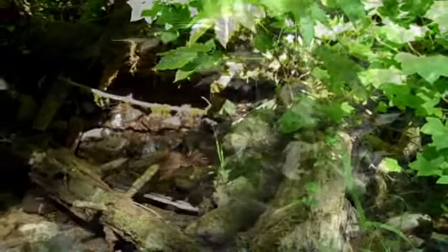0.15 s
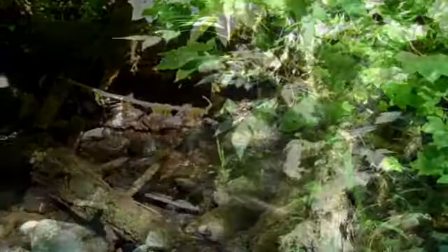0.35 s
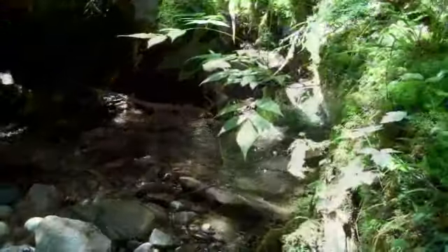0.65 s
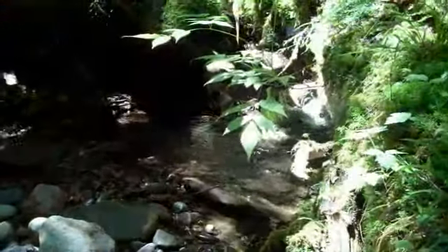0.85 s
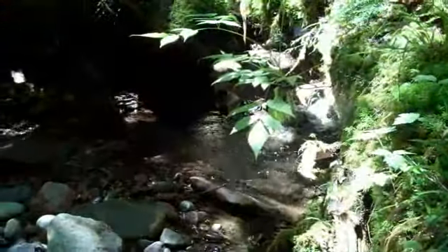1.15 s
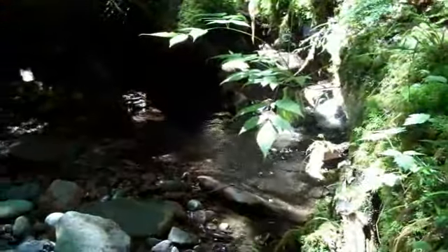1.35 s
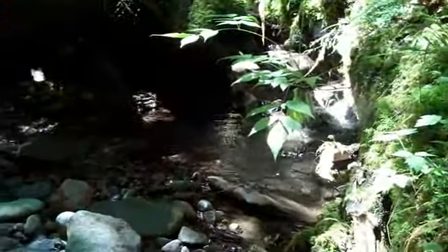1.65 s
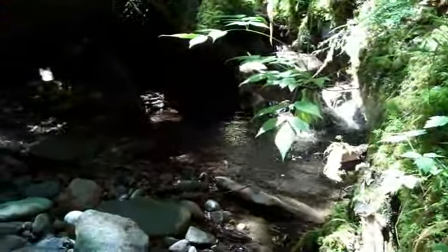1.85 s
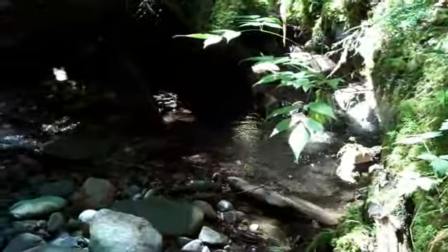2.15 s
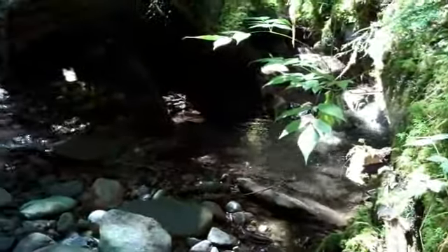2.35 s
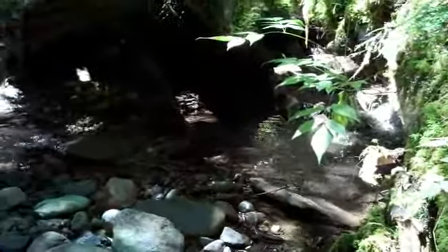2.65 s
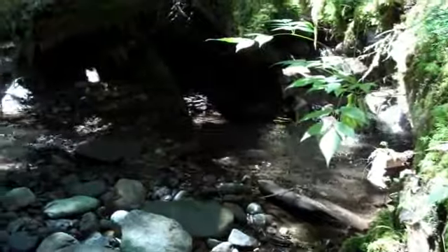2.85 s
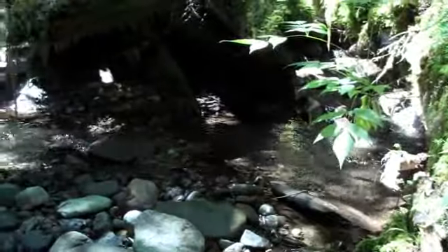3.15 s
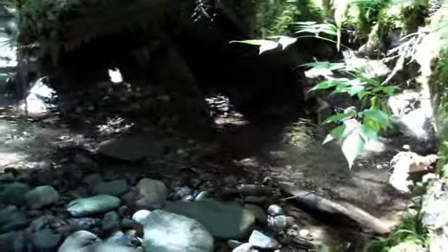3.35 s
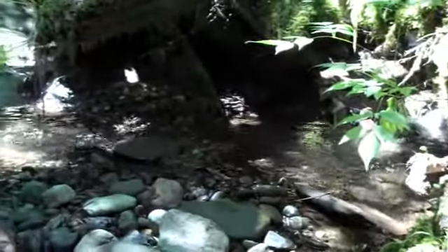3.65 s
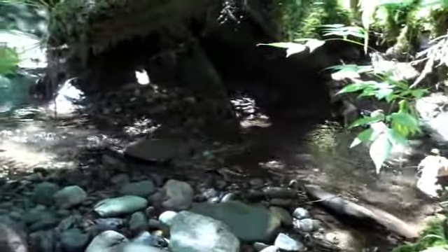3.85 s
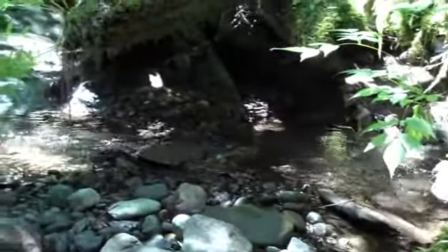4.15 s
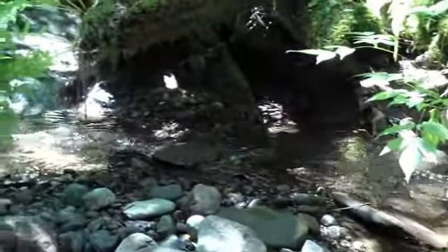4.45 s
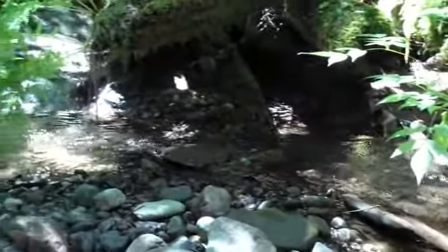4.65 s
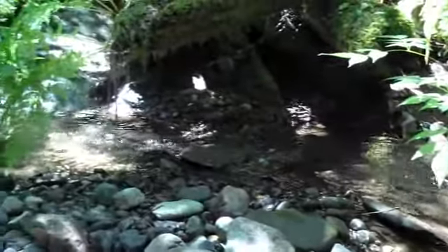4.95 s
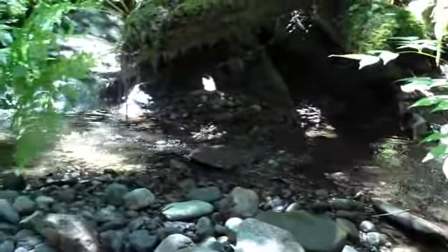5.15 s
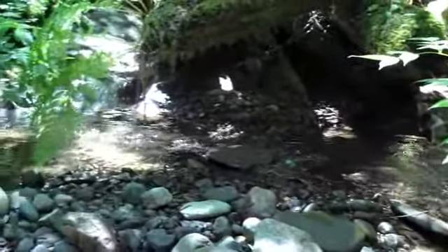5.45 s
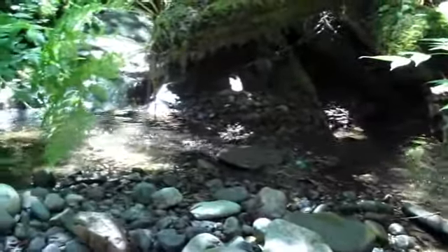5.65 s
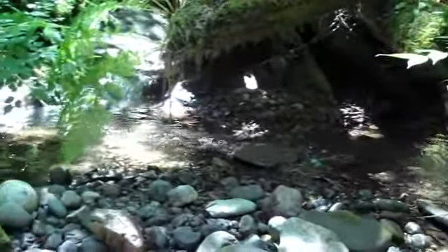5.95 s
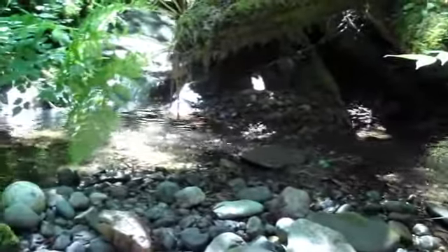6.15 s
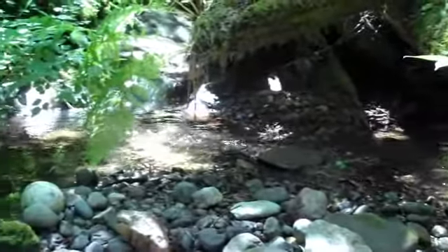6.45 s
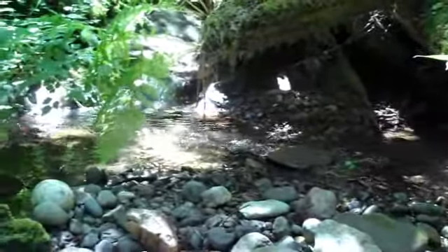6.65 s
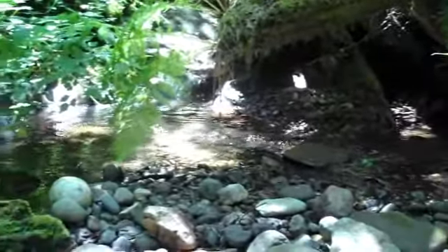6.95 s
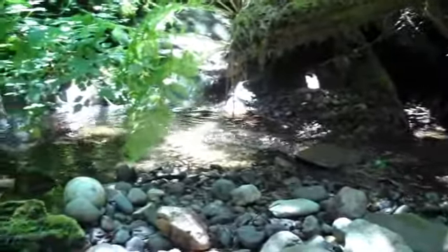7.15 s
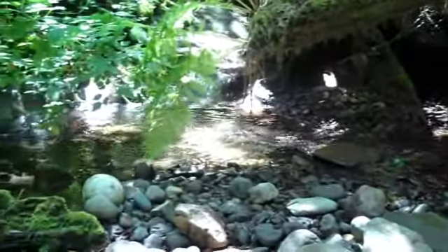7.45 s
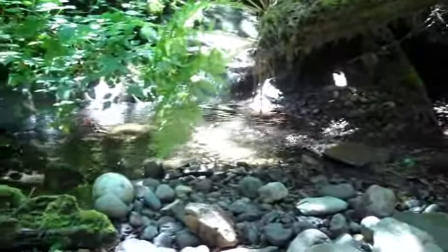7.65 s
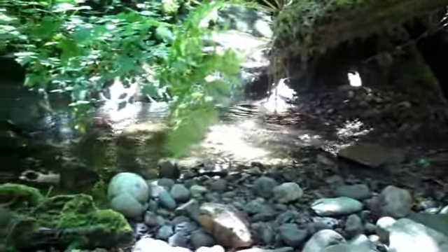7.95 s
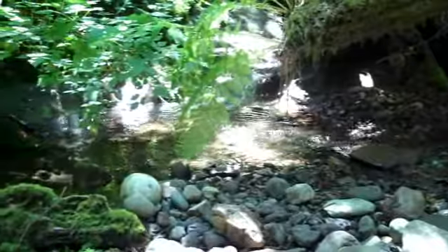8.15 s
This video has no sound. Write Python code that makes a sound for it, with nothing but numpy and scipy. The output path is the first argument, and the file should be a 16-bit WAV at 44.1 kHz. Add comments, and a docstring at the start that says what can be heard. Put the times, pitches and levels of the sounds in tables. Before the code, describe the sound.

Continuous creek water at close range under a mossy bank. A soft trickle quickly becomes a full babbling rush, growing stronger as the microphone turns towards the little fall. Spray sputters with tiny splashes and very brief lulls; pool water burbles low below, with irregular plops and muted glugs. Occasional crisp drop ticks stand out. Single channel, no noticeable echo, only water, still running at the end.

```python
"""Creek spilling into a pool

A small creek spills over stones into a pool under a mossy bank, heard from the pebbles at its edge. The rush
swells over the first second; the spray sputters, with brief lulls. Fall and spray are shaped noise mixed with
swarms of decaying sines, which are ringing bubbles. The pool adds low, damped bubbles under noise; glugs, plops
and drop ticks are single tones placed in time."""
import sys
import numpy as np
from scipy import signal
from scipy.fft import rfft, irfft, next_fast_len
from scipy.io import wavfile
from scipy.ndimage import uniform_filter1d

SR = 44100
rng = np.random.default_rng(int(sys.argv[2]) if len(sys.argv) > 2 else 0)


def unload_wav(signal):
    """Save mono or channel-first audio to the path in sys.argv[1] as 16-bit WAV at rate SR, clipped to [-1, 1]."""
    wavfile.write(
        sys.argv[1],
        SR,
        np.round(np.clip(np.atleast_2d(signal).T, -1, 1) * 32767).astype(np.int16),
    )


N = 366030
T = np.arange(N) / SR  # time of each sample, s
CUT_HZ = 8850  # upper band limit
HOP = 256  # spectral frame step, samples
FRAME = 4 * HOP  # spectral frame length, samples

# All levels below are relative: the functions that use them may add a gain.
# Steady level of the fall, the spray and the pool: [t/s, level/dB]
FALL_LEVEL = [(0, -52), (.18, -47.5), (.4, -45.5), (.62, -42.5), (1.0, -42), (3.4, -40.5), (5.6, -39.5),
              (7.4, -39), (8.3, -40)]
SPRAY_LEVEL = [(0, -44.5), (.1, -48), (.3, -50), (.55, -45), (.8, -41), (2.2, -40), (3.3, -40.5),
               (5.8, -39), (7.3, -38.5), (8.3, -38)]
POOL_LEVEL = [(0, -60.5), (.25, -53.5), (.42, -53.5), (.51, -48.5), (1.05, -44.5), (2.8, -45.5),
              (3.3, -46.5), (3.9, -45.5), (5.9, -46), (7, -45), (8.3, -45)]
# Spectra of the rush, the spray, its mist and the pool: [f/Hz, level/dB]
RUSH_SPECTRUM = [(150, -27.5), (300, -15), (400, -5.5), (470, 1), (620, -0.5), (720, 0.3), (860, 1.5),
                 (1030, 1.8), (1170, -0.5), (1450, -0.8), (1700, -2.5), (2200, -6), (2700, -4),
                 (3400, -26.5), (6000, -59.5)]
SPRAY_SPECTRUM = [(1200, -24.5), (1900, -4.5), (2550, -1.5), (3150, 1), (3500, -1.5), (3800, -4),
                  (4200, -5), (4600, -2.6), (5100, -1), (5570, -7), (5970, -0.5), (6120, -14), (6370, -11),
                  (6520, -58)]
MIST_SPECTRUM = [(1500, -13), (3000, -2.5), (6500, 1), (7400, 1), (8000, -3), (8700, -21)]
POOL_SPECTRUM = [(20, -32), (65, -27.5), (110, -32), (155, -15), (190, -5), (215, 0), (270, 1.5), (300, 0),
                 (345, 0.5), (430, -4.5), (650, -9), (1500, -58.5)]
# Depth of the treble flicker in narrow patches: [f/Hz, depth/dB]
FLICKER_DEPTH = [(1100, 0), (1400, 1.5), (1700, 2.8), (2200, 4.2), (2900, 5.4), (4100, 8.6), (5000, 7.4),
                 (6000, 6.5), (6600, 0)]
# The fall gushes over the stones: [t/s, level/dB]
GUSHES = [(.87, -42.5), (.98, -40.5), (1.18, -40.5), (1.41, -42), (1.68, -38), (1.96, -40.5), (2.19, -41.5),
          (2.64, -40), (3.88, -43.5), (4.3, -43), (5.15, -44), (5.58, -39.5), (5.89, -38.5), (6.01, -42),
          (6.7, -38.5), (7.01, -36.5), (7.53, -37), (7.82, -37.5)]
# Short sharp splashes on the stones: [t/s, level/dB]
SPLASHES = [(0.06, -46), (0.592, -43.7), (0.97, -42.7), (1.077, -44.6), (2.22, -42.0), (2.342, -39.5),
            (2.573, -42.2), (2.996, -41.8), (3.61, -43.7), (4.341, -42.4), (4.563, -43.0), (4.904, -39.8),
            (5.422, -42.7), (5.804, -41.3), (6.372, -42.7), (6.52, -40), (6.736, -42.7), (6.817, -40.8),
            (7.176, -38.8), (7.339, -40.1), (7.56, -41), (7.744, -40.9), (8.083, -40.9)]
# The spray slackens briefly: [t/s, length/s, dip/dB]
LULLS = [(0.14, .08, -4), (0.353, .07, -0.5), (0.685, 0.049, -4.5), (1.118, .12, -3.5), (1.444, .06, -5),
         (1.668, 0.057, -4.5), (1.885, 0.037, -3.5), (2.166, 0.042, -3.5), (3.404, 0.054, -2),
         (3.954, 0.086, -2.5), (4.38, 0.086, -3.5), (4.788, .05, -2.5), (4.945, .08, -2),
         (5.067, 0.045, -5.5), (5.507, 0.1, -4.5), (5.87, 0.065, -4), (6.15, 0.09, -3), (6.409, 0.061, -4),
         (6.764, .04, -4), (6.864, .03, -3.5), (7.049, 0.08, -6.5), (7.8, 0.054, -5), (7.892, 0.052, -4),
         (8.042, 0.033, -6)]
# The pool heaves as a gulp of air is dragged under: [t/s, level/dB]
HEAVES = [(.66, -46), (.8, -47), (1.0, -47), (2.15, -47), (2.46, -52), (2.63, -42.5), (2.91, -49),
          (3.12, -45), (3.91, -43), (4.28, -48), (4.69, -46), (5.04, -48), (5.16, -45), (5.27, -46),
          (6.49, -45), (8.18, -48.5)]
# Single drops tick sharply on the stones: [t/s, level/dB]
DROPS = [(0.059, -39), (0.973, -28), (2.341, -29.5), (3.036, -28), (3.263, -29), (4.566, -31), (5.476, -32),
         (7.175, -27)]
# Large air pockets under the stones: [t/s, f/Hz, level/dB]
GLUGS = [(0.203, 115, -61.5), (0.363, 104, -61), (0.421, 116, -61.5), (0.513, 109, -59), (0.661, 106, -55),
         (1.12, 128, -54), (1.177, 128, -58), (1.396, 108, -55), (1.452, 116, -55), (1.507, 122, -49),
         (1.607, 116, -56), (1.747, 129, -57), (1.932, 127, -53), (2.227, 113, -54), (2.276, 108, -58),
         (2.451, 107, -53), (2.583, 115, -55), (2.925, 121, -49), (3.032, 119, -51), (3.138, 134, -54.9),
         (3.219, 135, -53), (3.366, 121, -51), (3.567, 117, -56.5), (3.709, 127, -52), (3.845, 106, -54),
         (3.938, 140, -54), (4.049, 102, -56), (4.14, 150, -58), (4.305, 117, -51.5), (4.45, 155, -61),
         (4.756, 110, -53.4), (4.84, 136, -54.9), (4.95, 143, -53), (5.003, 114, -50.5), (5.33, 106, -55.5),
         (5.461, 131, -56.4), (5.518, 118, -57), (5.7, 155, -60), (5.839, 120, -56), (6.052, 112, -49.7),
         (6.225, 116, -52), (6.51, 145, -57), (6.628, 141, -53), (6.917, 107, -53), (6.997, 112, -53.5),
         (7.091, 130, -50), (7.155, 115, -54), (7.509, 109, -53), (7.652, 110, -54), (8.018, 133, -57),
         (8.219, 120, -49.5)]
# Single loud bubbles: [t/s, f/Hz, level/dB]
PLOPS = [(1.036, 226, -41.5), (1.855, 495, -42.5), (2.383, 538, -41.3), (2.464, 226, -40.3),
         (2.595, 247, -41.4), (2.635, 258, -39.9), (2.644, 850, -41.8), (2.792, 258, -39.2),
         (2.914, 269, -40.9), (3.695, 1033, -41.7), (3.701, 355, -41.8), (3.744, 473, -39.9),
         (4.31, 936, -41.6), (4.598, 1765, -39.6), (5.039, 247, -39.9), (5.146, 484, -39.0),
         (5.152, 322, -41.0), (5.474, 990, -40.1), (5.584, 904, -40.4), (5.904, 1065, -41.1),
         (6.098, 1001, -41.7), (6.121, 1668, -41.9), (6.487, 258, -41.0), (6.667, 958, -40.4),
         (6.711, 893, -39.4), (6.92, 764, -42.1), (7.52, 753, -41.7), (7.526, 441, -42.2),
         (7.561, 990, -41.1), (7.816, 645, -39.7), (8.054, 818, -41.5), (8.115, 226, -41.2)]


def gain_of(db):
    """Amplitude ratio: 20 dB is a factor of ten."""
    return 10 ** (np.asarray(db) / 20)


def evened(x):
    """Normalisation to unit rms, so that gains alone set the balance."""
    return x / np.sqrt(np.mean(x ** 2) + 1e-20)


def level_gain(curve):
    """Envelope: linear interpolation in decibels between the rows of a level table."""
    return gain_of(np.interp(T, *np.transpose(curve)))


def read(points, hz):
    """Interpolation of a spectral table along a logarithmic frequency axis."""
    at_hz, value = np.transpose(points)
    return np.interp(np.log(hz + 1), np.log(at_hz), value)


def coloured(x, spectrum):
    """Linear filtering: each frequency component is weighted by the spectrum; the rms becomes 1."""
    size = next_fast_len(N)
    weights = gain_of(read(spectrum, np.fft.rfftfreq(size, 1 / SR)))
    return evened(irfft(rfft(x, size) * weights, size)[:N])


def add(mix, s, sound):
    """Superposition: a sound starting at time s adds to the mix."""
    part = mix[max(round(s * SR), 0):][:len(sound)]
    part += sound[:len(part)]


def smoothed(x, span, axis):
    """Gaussian blur, two standard deviations being span cells; the result has unit rms."""
    shape = np.exp(-(np.pi * span * np.fft.rfftfreq(x.shape[axis])) ** 2 / 2)
    spectrum = rfft(x, axis=axis) * np.expand_dims(shape, 1 - axis)
    return evened(irfft(spectrum, x.shape[axis], axis=axis))


def patches(field, patch_hz, patch_s):
    """Correlation of a time-frequency field over a given duration and bandwidth."""
    along_time = smoothed(field, patch_s * SR / HOP, axis=0)
    return smoothed(along_time, patch_hz * FRAME / SR, axis=1)


def sputter(depth_db, span_s):
    """Amplitude modulation by a bounded random drift, as flow catches and lets go of the stones."""
    drift = smoothed(rng.standard_normal((N // HOP + 1, 1)), span_s * SR / HOP, axis=0)[:, 0]
    drift = np.interp(np.arange(N) / HOP, np.arange(len(drift)), drift)
    return evened(gain_of(depth_db * np.tanh(2 * drift)))


def bell(s, width_s):
    """Gaussian pulse in time, falling to 1/e at width_s from its centre."""
    return np.exp(-np.minimum(((T - s) / width_s) ** 2, 50))


def bursts(events, width_s):
    """Superposed Gaussian envelopes, one for each event."""
    return sum(gain_of(db) * bell(s, width_s) for s, db in events)


def foam(cloud_db, cloud_hz, cloud_s):
    """Modulated Gaussian noise: clouds of like-sized bubbles come and go in breaking water."""
    bins = FRAME // 2 + 1
    real, imag, clouds = rng.standard_normal((3, N // HOP + 6, bins))
    clouds = patches(clouds, cloud_hz, cloud_s)
    spectra = (real + 1j * imag) * gain_of(cloud_db * clouds)
    return evened(signal.istft(spectra.T, nperseg=FRAME, noverlap=FRAME - HOP)[1][:N])


def bubble(hz, cycles, rise, onset):
    """Damped oscillator: decays by e in some cycles, its pitch rising as it nears the surface."""
    age = np.arange(0, 6, hz / cycles / SR)  # in decay times, as are rise (per age) and onset
    ring = np.sin(2 * np.pi * cycles * (age + rise * age ** 2 / 2))
    return ring * np.exp(-age) * (1 - np.exp(-age / max(onset, 1e-3)))


def bubbles(low_hz, high_hz, per_s, cycles, rise, spread_db):
    """Random superposition of bubbles of many sizes: most are faint, a few stand out."""
    out = np.zeros(N)
    for when, size, strength, damping, depth in rng.random((int(per_s * N / SR), 5)):
        hz = low_hz + size * (high_hz - low_hz)
        ring = bubble(hz, cycles * (.5 + damping), 2 * rise * depth, onset=0.081)
        loud_db = spread_db * min(-np.log(1 - strength), 4)
        unit_energy = ring / np.linalg.norm(ring)
        add(out, when * N / SR, gain_of(loud_db) * unit_energy)
    return evened(out)


def impulses(per_s):
    """Shot noise: isolated random clicks at a mean rate."""
    return rng.standard_normal(N) * (rng.random(N) < per_s / SR)


def rush():
    """Broadband noise of a sheet breaking on stones, with bubble resonances, patter and gushes."""
    wash = foam(cloud_db=0.5, cloud_hz=650, cloud_s=0.046)
    babble = bubbles(low_hz=349.7, high_hz=2218, per_s=600, cycles=10, rise=0.035, spread_db=1.57)
    patter = bubbles(low_hz=910, high_hz=2020, per_s=120, cycles=1.06, rise=.05, spread_db=2.0)
    water = coloured(wash + gain_of(-10.5) * babble + gain_of(-14.5) * patter, RUSH_SPECTRUM)
    flow = gain_of(-0.2) * level_gain(FALL_LEVEL) * sputter(depth_db=.5, span_s=.035)
    gushes = gain_of(-2.0) * bursts(GUSHES, width_s=.028)
    return np.hypot(flow, gushes) * water  # the powers add


def surges():
    """Amplitude modulation of the spray: random sputter, with brief Gaussian dips in decibels."""
    lulls_db = sum(db * bell(s, length / 2) for s, length, db in LULLS)
    return gain_of(lulls_db) * sputter(depth_db=1.35, span_s=.024)


def spray():
    """Noise of fine foam, lightly damped tiny bubbles, and shot noise of spatter and misty droplets."""
    fizz = foam(cloud_db=1.6, cloud_hz=810, cloud_s=0.044)
    tinkle = bubbles(low_hz=1789, high_hz=6057, per_s=300, cycles=120, rise=0.0083, spread_db=3.0)
    spatter = evened(impulses(per_s=1500))
    splash = coloured(fizz + gain_of(-12.5) * tinkle + gain_of(-11) * spatter, SPRAY_SPECTRUM)
    steady = level_gain(SPRAY_LEVEL)
    splashes = gain_of(3.5) * bursts(SPLASHES, width_s=0.0028)
    surge = np.hypot(surges(), splashes / steady)
    droplets = coloured(impulses(per_s=3500), MIST_SPECTRUM)
    mist = gain_of(-22.5) * droplets * surge ** 0.92  # harder surges throw more mist
    return gain_of(-1.55) * steady * surge * (splash + mist)


def flickering(x, patch_hz, patch_s, chance):
    """Contrast expansion: narrow patches of strong treble stand out and weak ones sink."""
    spectra = signal.stft(x, nperseg=FRAME, noverlap=FRAME - HOP)[2].T
    hz, size = np.fft.rfftfreq(FRAME, 1 / SR), abs(spectra) + 1e-12
    around = uniform_filter1d(uniform_filter1d(size, size=9, axis=0), size=15, axis=1)
    strength = evened(size / around - 1) + chance * rng.standard_normal(size.shape)
    strength = patches(strength, patch_hz, patch_s)
    gain = gain_of(read(FLICKER_DEPTH, hz) * np.tanh(2 * strength + .9))
    gain /= np.sqrt(np.mean(gain ** 2, axis=0))  # unit rms gain over time at each frequency
    return signal.istft((spectra * gain).T, nperseg=FRAME, noverlap=FRAME - HOP)[1][:N]


def pool():
    """Low resonances: large, heavily damped bubbles churn, burble under the stones and heave."""
    gurgle = bubbles(low_hz=186.3, high_hz=401.5, per_s=70, cycles=5.4, rise=0.025, spread_db=1.2)
    burble = bubbles(low_hz=138, high_hz=187.2, per_s=30, cycles=6.2, rise=0.018, spread_db=.8)
    roll = coloured(rng.standard_normal(N), POOL_SPECTRUM)
    water = evened(roll + gain_of(-4.5) * coloured(gurgle, POOL_SPECTRUM))
    water = water + gain_of(-19.5) * coloured(burble, POOL_SPECTRUM)
    churn = level_gain(POOL_LEVEL) * sputter(depth_db=1.03, span_s=0.027)
    heaves = gain_of(1.7) * bursts(HEAVES, width_s=.024)
    return np.hypot(churn, heaves) * water


def drops(hz, cycles):
    """Strongly damped oscillation: the tick of a near drop decays by e in the given cycles."""
    out = np.zeros(N)
    tick = bubble(hz, cycles, rise=.02, onset=.4)
    tick = tick / abs(tick).max()
    for s, db in DROPS:
        add(out, s, gain_of(db) * tick)
    return out


def glugs(length_s, rise):
    """Enveloped tone of a large air pocket: swells and fades over a few cycles, rising in pitch."""
    out, age = np.zeros(N), np.arange(0, 1, 1 / (length_s * SR))
    swell = np.sin(np.pi * age) ** 2
    for s, hz, db in GLUGS:
        turns = hz * length_s * (age + rise * (age - .5) ** 2)
        add(out, s - length_s / 2, gain_of(db) * swell * np.sin(2 * np.pi * turns))
    return out


def plops(ring_s, rise, onset):
    """Free oscillation of single bubbles, each starting one decay time before its listed time."""
    out = np.zeros(N)
    for s, hz, db in PLOPS:
        add(out, s - ring_s, gain_of(db) * bubble(hz, hz * ring_s, rise, onset))
    return out


def scene():
    """Superposition of all the water in one channel."""
    fall = flickering(rush() + spray(), patch_hz=80, patch_s=.021, chance=1.4)
    churning = pool()
    ticks = drops(hz=2900, cycles=1.6)
    pockets = gain_of(0.5) * glugs(length_s=.052, rise=0.059)
    loud_bubbles = gain_of(9.5) * plops(ring_s=.011, rise=.015, onset=.4)
    return (fall + churning + ticks + pockets + loud_bubbles)[None]


def record(dry):
    """Band limitation: a linear-phase low-pass filter removes the highest frequencies."""
    low_pass = signal.firwin(511, CUT_HZ, window=("kaiser", 9), fs=SR)
    return signal.oaconvolve(dry, low_pass[None], "same")


dry = scene()
out = record(dry)
unload_wav(out)
```